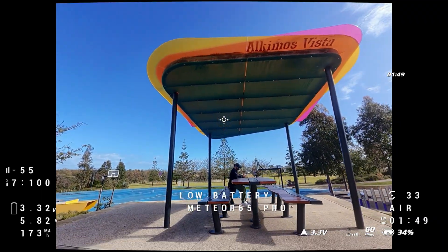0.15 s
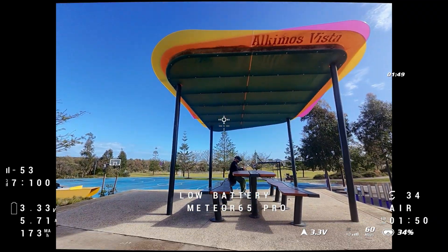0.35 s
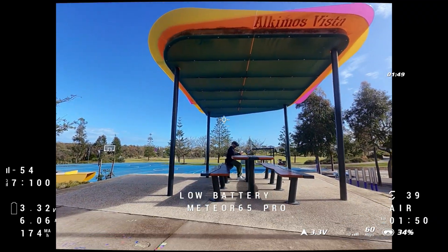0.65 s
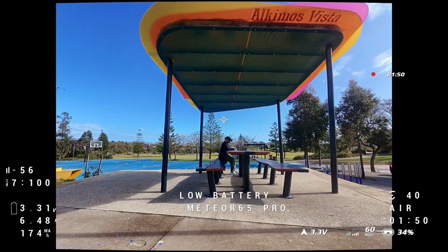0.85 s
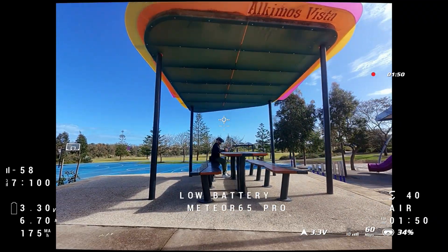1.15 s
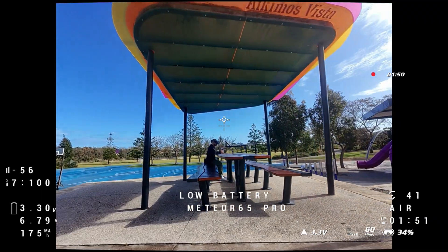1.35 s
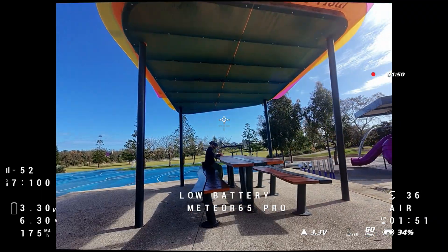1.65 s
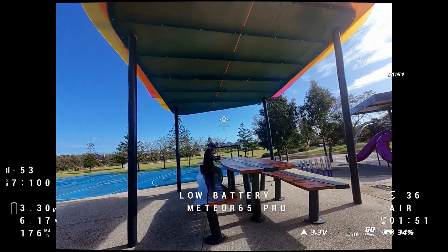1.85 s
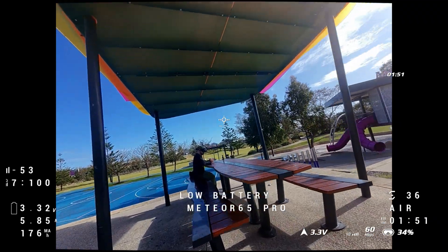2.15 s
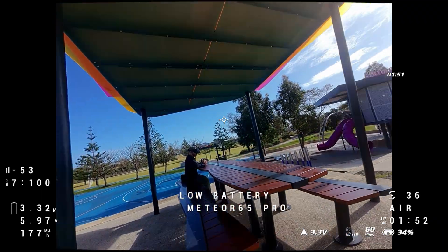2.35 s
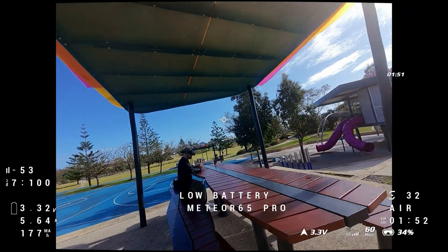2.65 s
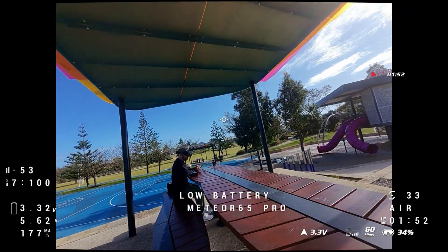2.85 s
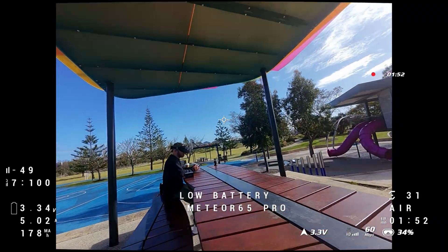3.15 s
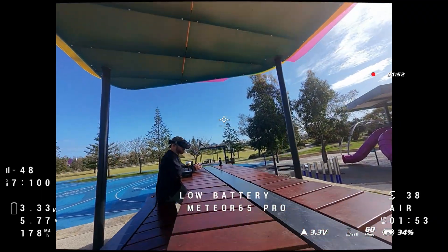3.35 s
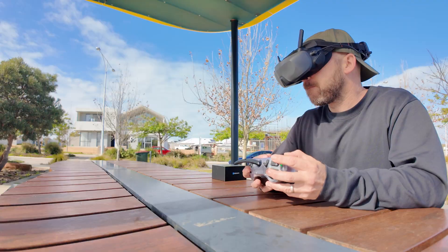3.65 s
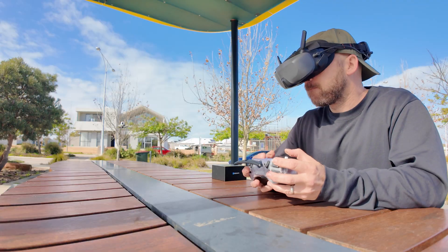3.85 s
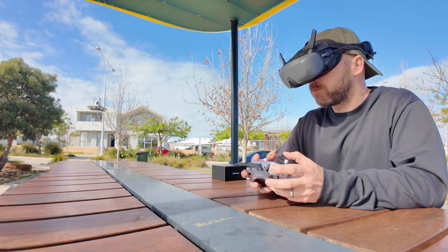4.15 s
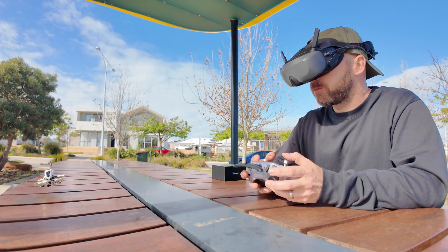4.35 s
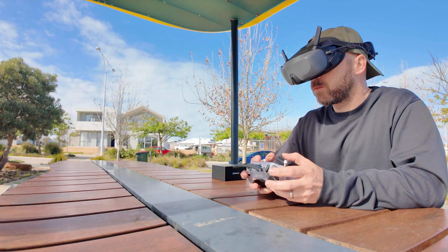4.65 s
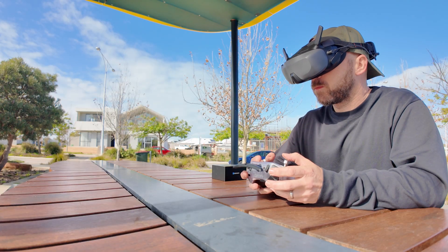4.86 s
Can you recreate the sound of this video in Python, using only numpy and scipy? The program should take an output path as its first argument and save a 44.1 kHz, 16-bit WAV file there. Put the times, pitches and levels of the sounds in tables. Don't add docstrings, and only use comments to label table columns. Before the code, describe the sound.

Outdoors in a quiet park, a palm-sized drone approaches with a faint, wavering multi-rotor whine and soft propeller hiss. It surges as it nears a wooden table under a roof, taps down and stops dead. After a brief near-silence, a plastic handset clacks sharply and rattles close to the small camera microphone, then is set down with duller knocks, ending in tiny switch clicks.

```python
import sys
import numpy as np
from scipy import signal
from scipy.fft import rfft, irfft
from scipy.io import wavfile

SR = 44100
rng = np.random.default_rng(int(sys.argv[2]) if len(sys.argv) > 2 else 0)


def log_audio(samples):
    frames = np.atleast_2d(samples).T
    limited = np.clip(frames, -1, 1)
    pcm = np.round(limited * 32767).astype(np.int16)
    wavfile.write(sys.argv[1], SR, pcm)


def decibels_to_gain(level_db):
    exponent = np.asarray(level_db, float) / 20
    return 10 ** exponent


N = 220896

# t/s, front left f/Hz, front right f/Hz, rear left f/Hz, rear right f/Hz
ROTOR_SPEED = [(0, 486, 465, 486, 463), (.25, 472, 464, 447, 442), (.47, 459, 437, 449, 431),
               (.7, 463, 466, 461, 433), (.9, 503, 483, 466, 443), (1.15, 514, 484, 477, 472),
               (1.4, 514, 487, 476, 466), (1.9, 495, 490, 450, 452), (2.2, 492, 470, 438, 438),
               (2.57, 503, 491, 451, 431), (2.7, 491, 482, 435, 414), (3.0, 492, 472, 441, 413),
               (3.26, 444, 449, 408, 377), (3.44, 508, 509, 455, 421), (3.6, 540, 522, 460, 434),
               (3.7, 573, 558, 508, 481), (3.9, 554, 540, 496, 480), (4.1, 549, 533, 491, 473)]
# t/s, half width/s, level/dB
BLADE_BEAMS = [
    [(.72, 0.21, -82), (1.3, 0.16, -59), (2.27, 0.11, -62), (2.6, 0.073, -68), (3.27, 0.061, -64),
     (3.72, .1, -49), (3.95, 0.11, -46)],
    [(.68, 0.085, -65), (1.33, 0.36, -65.5), (2.2, 0.061, -82), (2.66, 0.093, -63.5), (3.1, 0.07, -64),
     (3.68, .08, -56.5), (4.04, 0.087, -42.5)],
    [(.2, 0.4, -79), (.9, .07, -65), (1.3, 0.083, -67), (2.93, 0.086, -64.5), (3.28, 0.21, -66.5),
     (3.68, 0.17, -59), (4.02, 0.064, -47)],
    [(.05, .1, -69.5), (.4, .07, -75), (.82, 0.16, -72), (1.3, 0.19, -62.5), (1.9, 0.044, -74),
     (3.07, 0.17, -62.5), (3.55, 0.18, -57), (3.88, 0.18, -58)],
]
# t/s, half width/s, level/dB
OCTAVE_BEAMS = [
    [(.12, 0.12, -66), (.3, 0.071, -86), (.58, 0.18, -66), (.9, 0.091, -72), (1.1, 0.11, -63),
     (1.33, 0.17, -65), (1.9, .2, -74), (2.65, 0.22, -75), (3.07, 0.081, -59), (3.54, 0.12, -49),
     (3.78, 0.076, -51), (4.04, 0.037, -48)],
    [(.12, 0.042, -67), (.4, 0.093, -87), (.9, .06, -70), (1.12, 0.14, -69), (1.35, 0.15, -61),
     (1.6, 0.11, -73), (3.5, 0.098, -59), (3.75, 0.066, -77), (3.97, .12, -62)],
]
BLADE_OFF_BEAM_DB, OCTAVE_OFF_BEAM_DB = -76.5, -91.5
ROTOR_IMBALANCE = [-16, -16, 2.5, -5]
ROTOR_OVERTONE = [-11.5, -3, 0, -7]
# t/s, level/dB
WOBBLE_LEVEL = [(0, -72), (.6, -79), (1.3, -79), (1.78, -80), (1.9, -63.5), (2.25, -69), (2.7, -62),
                (3.0, -63.5), (3.3, -68), (3.42, -65.5), (3.52, -76), (3.75, -60.5), (3.9, -59.5),
                (4.02, -48.5)]
# multiple of turning rate, level/dB
WHINE_ORDERS = [(5, -22), (6, -24.5), (7, -19), (8, -18.5), (9, -16.5), (10, -20), (11, -20), (12, -17.5),
                (15, -21), (18, -26.5), (21, -27.5)]
# t/s, half width/s, level/dB
MOTOR_STRAIN = [
    (3.08, .1, 0),
    (3.5, 0.091, -16),
    (3.75, 0.068, -6),
    (4.03, 0.038, -16),
]

# t/s, level/dB, extra level of blade tips turned to the microphone/dB
WASH_LEVEL = [(0, -66, 1), (.3, -69, -0.5), (1.2, -65, -2), (2.02, -65, -.5), (2.25, -67.5, 5.5),
              (2.42, -65.5, 1), (2.67, -64, 8.5), (2.8, -63, 3), (2.92, -60, 1.5), (2.98, -57, 6.5),
              (3.13, -55, -2.5), (3.3, -63.5, -0.5), (3.38, -60, -1.5), (3.45, -52, -2.5),
              (3.57, -49.5, -1.5), (3.63, -45.5, -1.5), (3.8, -45, 0.5), (4.03, -39.5, -1)]
# f/Hz, level per Hz/dB
WASH_SPECTRUM = [(300, -11.5), (700, -3), (1300, -3), (2000, 1.5), (2600, 0.5), (2800, 3), (3500, -0.5),
                 (5800, -5.5), (7200, 0.5), (8300, 0.5), (10000, -5), (10600, -7), (12400, -9),
                 (14000, -16)]
WASH_SPLITS = [2700, 5700, 10600]
# t/s, half width/s, level/dB
DOWNWASH_SLAPS = [
    (3.78, 0.036, -56),
    (3.86, 0.022, -56),
    (3.96, 0.035, -45),
    (4.057, .022, -37.5),
]
LOW_WASH_DB, LOW_BELOW_DB = -67, -17
TOP_HISS_DB, TOP_BELOW_DB = -77, -21.5
OVER_TABLE_S, OVER_TABLE_RISE_S, OVER_TABLE_DB = 3.67, 0.092, 14.5
# delay t/s, level/dB
NEAR_BOUNCES = [
    (.0009, -26),
    (.0023, -21.5),
    (.0061, -44.5),
]
# f/Hz, width/Hz, level/dB
GUARD_PEAKS = [(2380, 560, -4.5), (3970, 440, -10), (5650, 270, -1.5), (8300, 330, 0.5), (9300, 400, 0),
               (9990, 360, 2.5), (12600, 580, 3.5), (15400, 450, 9)]
STOP_S, STOP_FALL_S = 4.078, 0.0025
HISS_TAIL_DB, HISS_TAIL_S = 2, 0.016

# t/s, crack level/dB, spring level/dB
FEET_HITS = [
    (3.995, -50, -48),
    (4.02, -50, -44),
    (4.0414, -31, -47),
    (4.0474, -34, -40),
    (4.064, -43, -38),
]
FEET_TABLE_DB, FEET_SHELL_DB = -16.5, -12
# t/s, crack, table, shell and switch spring level/dB
HANDSET_HITS = [(4.4635, -22.5, -35, -31, -40.5), (4.4654, -42, -24, -12.5, -15.5),
                (4.4677, -9, -42, -13, -22.5), (4.4752, -10, -18, -14.5, -32.5),
                (4.4778, -33, -54, -43, -36), (4.4881, -23, -44, -26.5, -49), (4.5037, -31, -31, -34, -42),
                (4.5975, -44, -42, -49, -46), (4.606, -56, -57, -48, -61), (4.625, -46, -55, -36, -55),
                (4.6302, -42, -28, -37, -53), (4.6362, -50, -33, -32, -27.5),
                (4.6457, -36, -63, -29.5, -54), (4.65, -25, -23, -23, -45),
                (4.6533, -46, -20.5, -30.5, -47), (4.659, -43, -47, -36, -35),
                (4.6671, -65.5, -51, -55, -50), (4.8131, -71, -44, -62, -88)]
# t/s, crack level/dB, switch spring level/dB
SWITCH_CLICKS = [
    (4.9264, -55, -59),
    (4.9325, -50, -56),
    (4.9414, -53, -49),
    (4.9548, -46, -42),
    (4.962, -41.5, -36),
    (4.9715, -50, -54),
    (4.985, -63, -60),
]
FINGER_TABLE_DB, FINGER_SHELL_DB = -4, -20
# f/Hz, level/dB, t60/s
TABLE_MODES = [(242.7, -1, .28), (334.8, -1.5, 0.23), (369, -12.5, 0.36), (471, -22.5, 0.088),
               (584.6, -2, 0.4), (660, -5.5, .2), (601, -8, 0.36), (732, -2.5, .1)]
# f/Hz, level/dB, t60/s
SHELL_MODES = [(950, -8.5, 0.11), (1074, 1, .13), (1197, -1.5, 0.072), (1318, -9, 0.065),
               (1320, -3.5, 0.096), (1486, -6, .07), (1683, -6, .09), (1846, -21, 0.14), (2120, -6, .07),
               (2272, -9, 0.18), (2284, -10, 0.16), (2390, -7.5, 0.077), (2834, -4.5, .06),
               (3225, -8, 0.054), (3370, -2.5, 0.038)]
# f/Hz, level/dB, t60/s
SPRING_MODES = [(4576, -14, .04), (4990, -4, .06), (5130, -2, .07), (5255, -5, .06), (5380, -7, .06),
                (6210, -14, .05), (8200, -18, .03), (10400, -20, .03), (14300, -13, .03), (15400, -15, .03)]
# low f/Hz, high f/Hz, level/dB, t60/s
RATTLE_BANDS = [
    (69.4, 275, -33, 0.94),
    (277, 796, -21.5, 0.39),
    (908, 2200, -15, 0.094),
    (2200, 6100, -2.5, 0.041),
    (6940, 8600, -10, 0.012),
    (12170, 16700, -11, 0.032),
]
# t/s, level/dB
LEVER_KNOCKS = [
    (4.6298, -33.5),
    (4.6431, -25),
    (4.653, -37),
]
LEVER_HZ, LEVER_T60_S = 1276, .09
SLIDE_S, SLIDE_END_S, SLIDE_DB, SLIDE_LOW_HZ = 4.927, 4.99, -60.5, 2000

# f/Hz, t60/s
ROOF_DECAY = [
    (300, .25),
    (1200, .22),
    (4000, .2),
    (12000, .15),
]
# f/Hz, level per Hz/dB
AIR_SPECTRUM = [(20, -21), (45, 0), (75, 0.5), (160, -1.5), (230, -5.5), (500, -7), (1100, -9.5),
                (2000, -17.5), (3300, -24), (3900, -31), (5000, -35.5), (16000, -39)]
AIR_SPLIT_HZ = 140
RUMBLE_DB, BREEZE_DB = -65, -62
BREEZE_GAIN_DB, BREEZE_GAIN_S = 8, 0.13
MIC_LOW_HZ, MIC_TOP_HZ = 55, 15900


def drone():
    turns = rotor_turns()
    since_stop = np.maximum(np.arange(N) / SR - STOP_S, 0)
    running = np.exp(-since_stop / STOP_FALL_S)
    tail_gain = decibels_to_gain(HISS_TAIL_DB)
    hiss_fade = (running + tail_gain * np.exp(-since_stop / HISS_TAIL_S)) / (1 + tail_gain)
    direct = wash(turns)
    bounces = sum(decibels_to_gain(level_db) * np.roll(direct, int(late * SR)) for late, level_db in NEAR_BOUNCES)
    return running * rotor_tones(turns) + hiss_fade * (direct + bounces)


def rotor_turns():
    steps = [2 * np.pi / SR * speed * (1 + 0.002555 * drift(25.5)) for speed in in_time(ROTOR_SPEED)]
    return np.cumsum(steps, axis=1)


def rotor_tones(turns):
    speeds = in_time(ROTOR_SPEED)
    wobble_db, = in_time(WOBBLE_LEVEL)
    blades_db = [swells(rows, BLADE_OFF_BEAM_DB) for rows in BLADE_BEAMS]
    front_db, rear_db = [swells(rows, OCTAVE_OFF_BEAM_DB) for rows in OCTAVE_BEAMS]
    octaves_db = np.array([front_db, front_db, rear_db, rear_db]) + np.array(ROTOR_OVERTONE)[:, None]
    whine_db = in_time(WASH_LEVEL)[0] + swells(MOTOR_STRAIN, 0)
    colour_hz, colour_db = np.transpose(WASH_SPECTRUM)
    out = 0
    for rotor, (angle, speed) in enumerate(zip(turns, speeds)):
        slow, swell, sway = drift(24), drift(55), drift(75)
        blade = np.sin(3 * angle + .35 * sway)
        octave = np.sin(6 * angle + .3 * sway) + .2 * np.sin(9 * angle + .4 * sway)
        out = out + decibels_to_gain(blades_db[rotor]) * (1 + .3 * swell) * blade
        out = out + decibels_to_gain(octaves_db[rotor] + 1.0 * slow) * octave
        out = out + decibels_to_gain(wobble_db + ROTOR_IMBALANCE[rotor]) * (1 + 0.062 * slow) * np.sin(angle)
        for order, level_db in WHINE_ORDERS:
            seen_db = np.interp(order * speed, colour_hz, colour_db) + 0.68 * np.roll(slow, order * 4001)
            out = out + decibels_to_gain(whine_db + level_db + seen_db) * np.sin(order * angle + .5 * sway)
    return np.sqrt(2) * out


def wash(turns):
    edges = [1., *WASH_SPLITS, 30000.]
    gust = .5 * drift(3.0)
    hiss = 0
    for level_db, low_hz, high_hz in zip(wash_levels(), edges, edges[1:]):
        flutter_db = 3.0 * gust + 1.17 * drift(31)
        hiss = hiss + decibels_to_gain(level_db - 2.0 + flutter_db) * coloured(WASH_SPECTRUM, low_hz, high_hz)
    beat = 1 + 0.051 * np.sum(np.sin(turns), axis=0)
    return beat * hiss


def wash_levels():
    level_db, tips_db = in_time(WASH_LEVEL)
    opened = (1 + np.tanh((np.arange(N) / SR - OVER_TABLE_S) / OVER_TABLE_RISE_S)) / 2
    low = decibels_to_gain(swells(DOWNWASH_SLAPS, LOW_WASH_DB)) + decibels_to_gain(level_db + LOW_BELOW_DB)
    top = decibels_to_gain(TOP_HISS_DB) + decibels_to_gain(level_db + tips_db + TOP_BELOW_DB + OVER_TABLE_DB * opened)
    return 20 * np.log10(low), level_db, level_db + tips_db, 20 * np.log10(top)


def propeller_guards(x):
    for hz, width_hz, level_db in GUARD_PEAKS:
        w, a = 2 * np.pi * hz / SR, decibels_to_gain(level_db / 2)
        q = np.sin(w) * width_hz / (2 * hz)
        middle = -2 * np.cos(w)
        x = signal.lfilter([1 + q * a, middle, 1 - q * a], [1 + q / a, middle, 1 - q / a], x)
    return x


def knocks():
    s, crack_db, table_db, shell_db, spring_db = contacts()
    table_low_cut = signal.butter(8, 232, "high", fs=SR, output="sos")
    table = signal.sosfilt(table_low_cut, body(TABLE_MODES, table_db - 8.0, spread_db=2.5))
    shell = body(SHELL_MODES, shell_db - 12, spread_db=2.0)
    spring = body(SPRING_MODES, spring_db - 6, spread_db=1.5)
    return snap(crack_db + 4.0) + table + shell + spring + rattle(crack_db - 10, table_db, shell_db)


def contacts():
    feet = [(s, db, db + FEET_TABLE_DB, db + FEET_SHELL_DB, spring) for s, db, spring in FEET_HITS]
    finger = [(s, db, db + FINGER_TABLE_DB, db + FINGER_SHELL_DB, spring) for s, db, spring in SWITCH_CLICKS]
    return np.transpose(feet + HANDSET_HITS + finger)


def contact_clicks(level_db):
    clicks = np.zeros(N)
    clicks[(contacts()[0] * SR).astype(int)] = decibels_to_gain(level_db)
    return clicks


def snap(crack_db):
    return ring(contact_clicks(crack_db), 2400, 0.00078)


def body(modes, blow_db, spread_db):
    luck = rng.standard_normal((len(blow_db), len(modes)))
    out = 0
    for k, (hz, level_db, t60) in enumerate(modes):
        clicks = contact_clicks(blow_db + level_db + spread_db * luck[:, k])
        out = out + ring(clicks * (-1) ** k, hz, t60)
    return out


def rattle(crack_db, table_db, shell_db):
    blows = [table_db, table_db, shell_db, crack_db, crack_db, crack_db]
    out = 0
    for blow_db, (low_hz, high_hz, level_db, t60) in zip(blows, RATTLE_BANDS):
        burst = contact_clicks(blow_db + level_db)
        envelope = signal.lfilter([1], [1, -decibels_to_gain(-60 / (t60 * SR))], burst + 1e-18)
        dying = envelope * rng.standard_normal(N)
        band = signal.butter(2, [low_hz, high_hz], "band", fs=SR, output="sos")
        out = out + signal.sosfilt(band, dying) * np.sqrt(SR / 2 / (high_hz - low_hz))
    return out


def lever():
    s, level_db = np.transpose(LEVER_KNOCKS)
    clicks, t = np.zeros(N), np.arange(N) / SR
    clicks[(s * SR).astype(int)] = decibels_to_gain(level_db)
    rubbing = np.clip((t - SLIDE_S) / 0.006, 0, 1) * np.exp(-np.maximum(t - SLIDE_END_S, 0) / .008)
    band = signal.butter(2, [SLIDE_LOW_HZ, 11000], "band", fs=SR, output="sos")
    rub = signal.sosfilt(band, rng.standard_normal(N))
    return ring(clicks, LEVER_HZ, LEVER_T60_S) + decibels_to_gain(SLIDE_DB + 1.9 * drift(60)) * rubbing * rub


def roof(x):
    t = np.arange(SR // 2) / SR
    tail = 0
    for hz, t60 in ROOF_DECAY:
        band = signal.butter(1, [hz / 2, min(hz * 2.0, 20000)], "band", fs=SR, output="sos")
        noise = signal.sosfilt(band, rng.standard_normal(len(t)))
        tail = tail + noise * decibels_to_gain(-60 * t / t60) * (t > .004)
    return signal.fftconvolve(x, tail / np.sqrt(np.sum(tail ** 2)))[:N]


def park_air():
    rumble_db = RUMBLE_DB + 1.6 * drift(5.1)
    after_stop = [(STOP_S, BREEZE_GAIN_S, BREEZE_DB + BREEZE_GAIN_DB - 7)]
    breeze_db = swells(after_stop, BREEZE_DB) + 0.6 * drift(5.9)
    rumble = decibels_to_gain(rumble_db) * coloured(AIR_SPECTRUM, high_hz=AIR_SPLIT_HZ)
    return rumble + decibels_to_gain(breeze_db) * coloured(AIR_SPECTRUM, low_hz=AIR_SPLIT_HZ)


def in_time(rows):
    s, *columns = np.transpose(rows)
    return np.array([np.interp(np.arange(N) / SR, s, c) for c in columns])


def swells(rows, rest_db):
    t = np.arange(N) / SR
    bells = sum(decibels_to_gain(db) * np.exp(-((t - s) / width) ** 2) for s, width, db in rows)
    return 20 * np.log10(decibels_to_gain(rest_db) + bells)


def rms_one(x):
    return x / np.sqrt(np.mean(x ** 2) + 1e-20)


def coloured(points, low_hz=0.94, high_hz=30000.):
    hz = np.arange(1, N // 2 + 2) * SR / N
    point_hz, point_db = np.transpose(points)
    gain = decibels_to_gain(np.interp(np.log(hz), np.log(point_hz), point_db))
    edges = np.sqrt((1 + (low_hz / hz) ** 20) * (1 + (hz / high_hz) ** 20))
    return rms_one(irfft(rfft(rng.standard_normal(N)) * gain / edges, N))


def drift(rate_hz):
    r = np.exp(-2 * np.pi * rate_hz / SR)
    return rms_one(signal.lfilter([1], [1, -2 * r, r * r], rng.standard_normal(N + SR))[SR:])


def ring(clicks, hz, t60):
    r, w = decibels_to_gain(-60 / (t60 * SR)), 2 * np.pi * hz / SR
    return signal.lfilter([0, np.sin(w)], [1, -2 * r * np.cos(w), r * r], clicks + 1e-18)


def scene():
    flight, hits = propeller_guards(drone()), knocks()
    echoes = roof(decibels_to_gain(-11) * flight + decibels_to_gain(-18.5) * hits)
    return (flight + hits + echoes + park_air() + lever())[None]


def roll_off(x):
    return signal.sosfilt(signal.butter(12, 16850, fs=SR, output="sos"), x)


def record(dry):
    bass_cut = signal.butter(4, MIC_LOW_HZ, "high", fs=SR, output="sos")
    top_cut = signal.ellip(8, .5, 50, MIC_TOP_HZ, fs=SR, output="sos")
    mix = signal.sosfilt(np.vstack([bass_cut, top_cut]), dry)
    return roll_off(mix)


dry = scene()
out = record(dry)
log_audio(out)
```